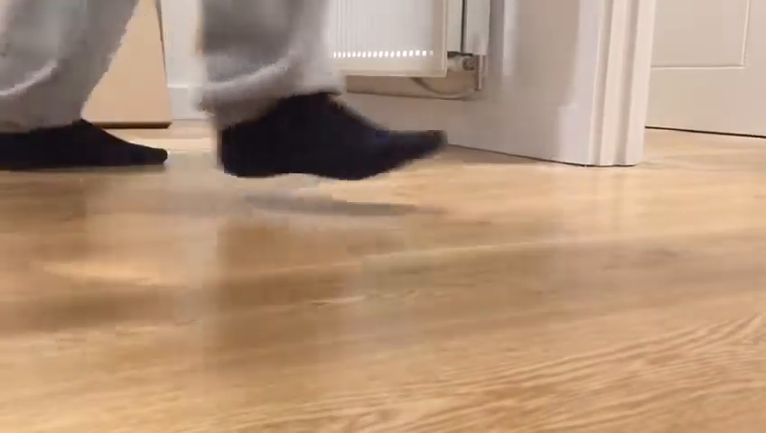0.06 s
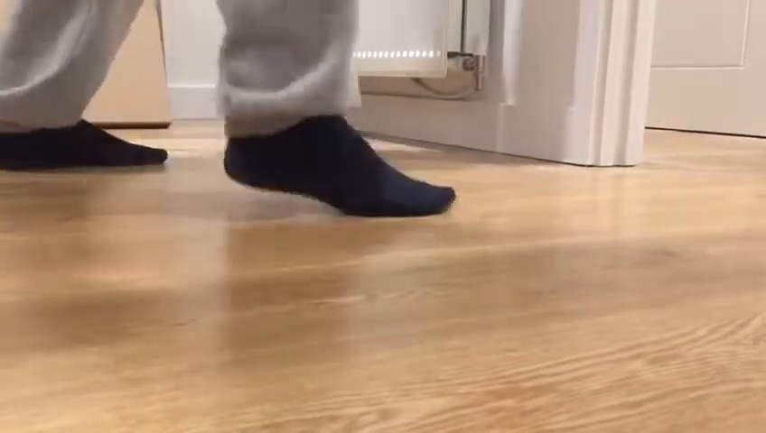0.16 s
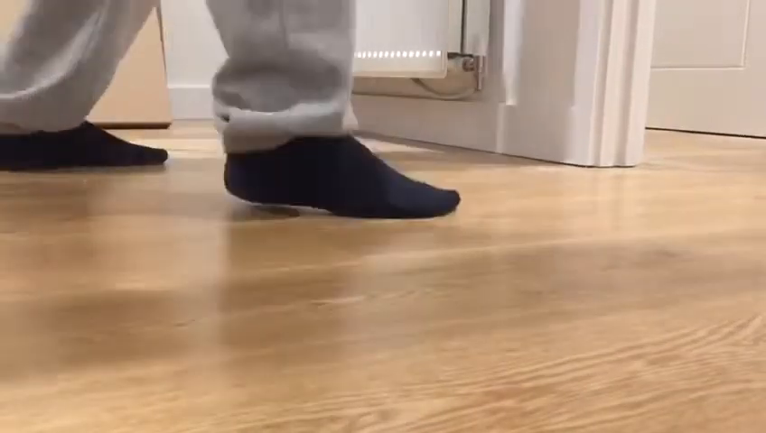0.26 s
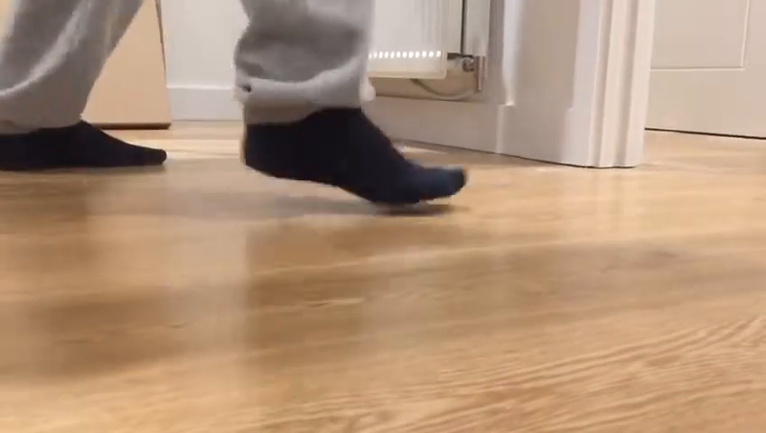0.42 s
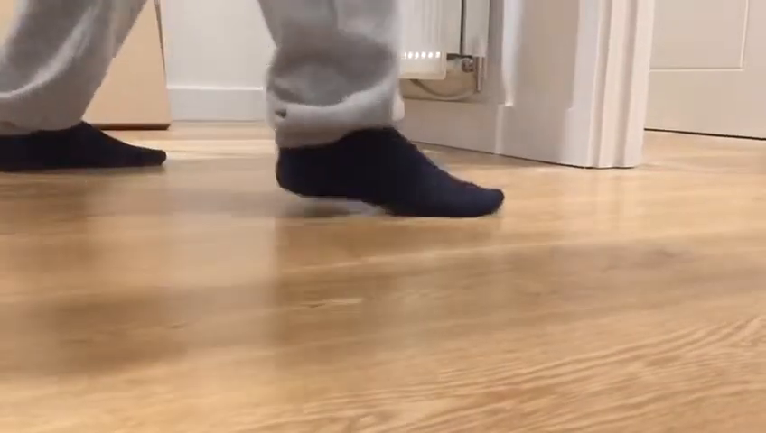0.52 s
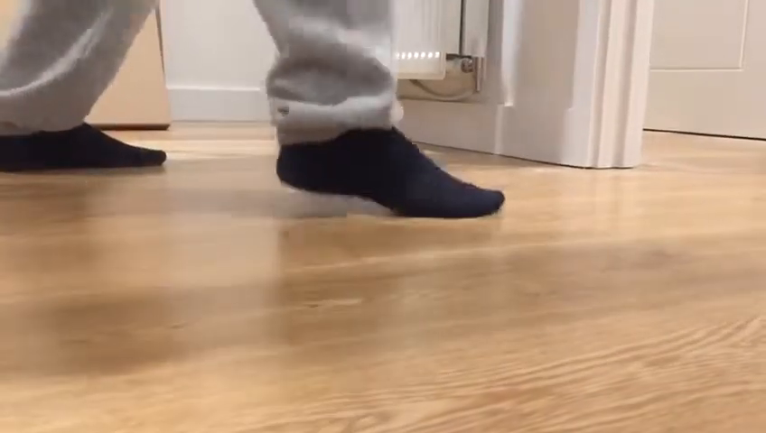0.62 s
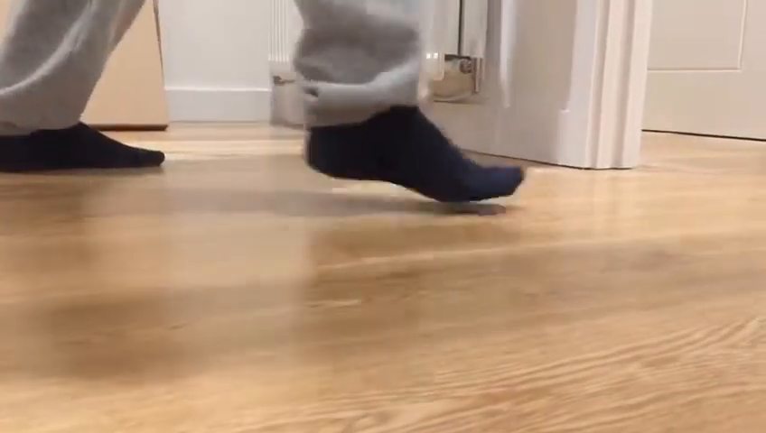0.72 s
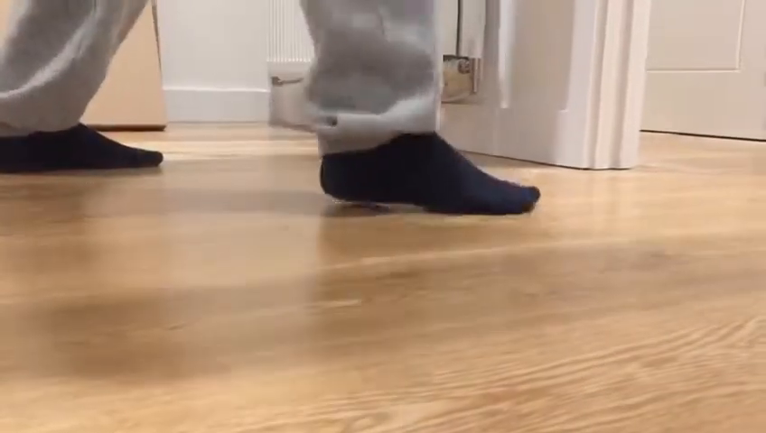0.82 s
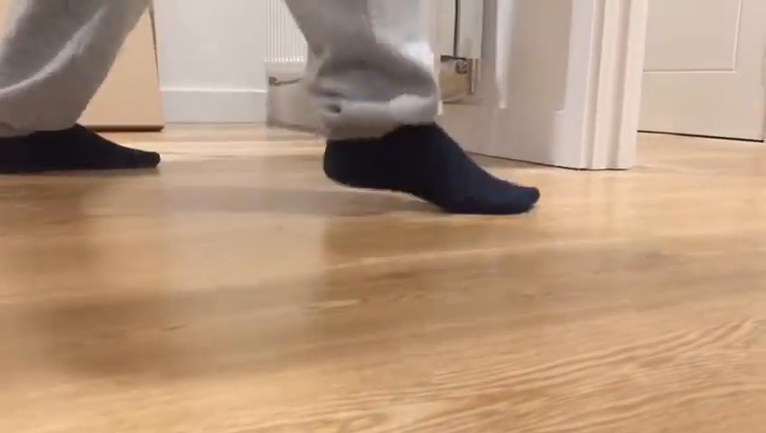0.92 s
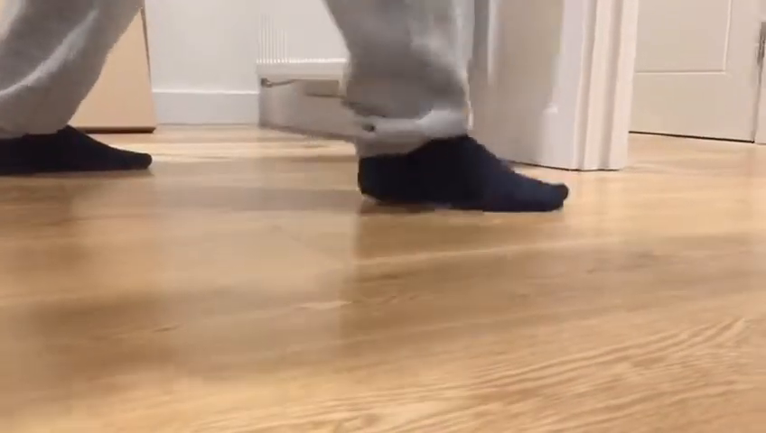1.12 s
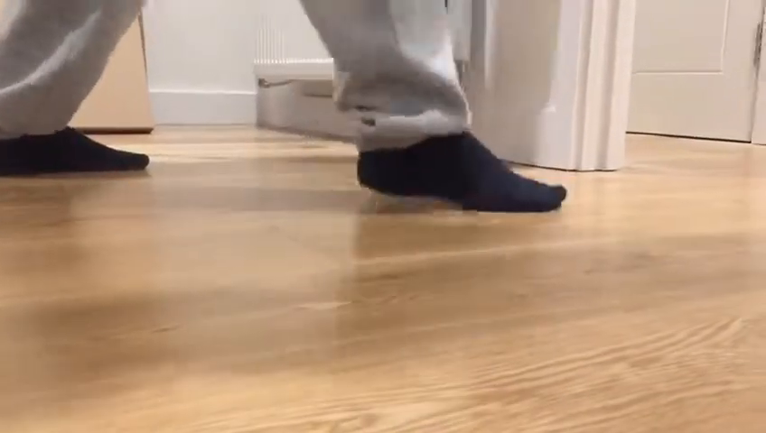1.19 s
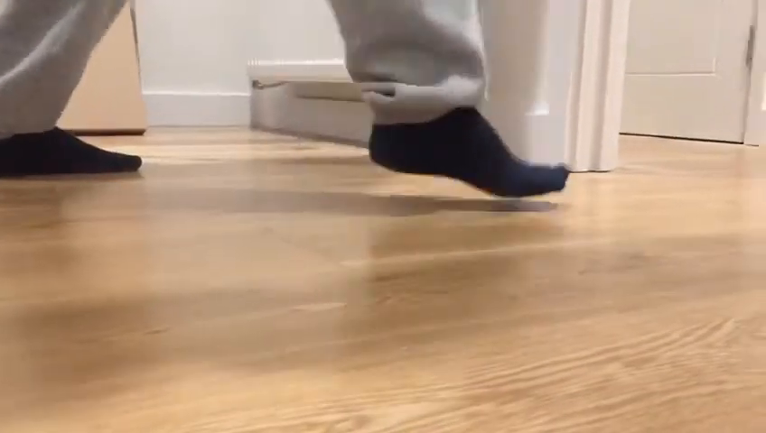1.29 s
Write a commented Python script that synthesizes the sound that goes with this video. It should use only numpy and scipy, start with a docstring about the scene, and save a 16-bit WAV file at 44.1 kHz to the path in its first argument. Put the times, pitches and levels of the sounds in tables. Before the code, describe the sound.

A wooden floor snaps under a socked foot at about 0.2 seconds, one sharp click over a low thud, ringing briefly in a small, bare room. Three much fainter knocks follow at roughly 0.6, 0.85 and 1.15 seconds as the foot shifts. Very soft brushes of sock on wood come and go from 0.5 to 1.3 seconds. A low room drone and faint hiss continue throughout.

```python
"""A joint in a wooden floor snaps under a foot in a sock, in a small, bare room.
The joint gives way in a few quick slips, each exciting the damped modes of the board and of the floor
beneath: a sharp click over a boom. Three faint knocks follow as the foot shifts. Between them the sock
brushes the wood with friction noise. Diffuse reflections and standing waves prolong the sounds of
the wood, over a low room drone and a faint hiss."""
import sys
import numpy as np
from scipy import signal
from scipy.fft import rfft, irfft, next_fast_len
from scipy.io import wavfile
from scipy.ndimage import uniform_filter1d

SR = 44100
rng = np.random.default_rng(int(sys.argv[2]) if len(sys.argv) > 2 else 0)


def transcribe(u):
    """Save the signal u as a 16-bit wav file named by the first command-line argument.

    u: samples, shape (n,) or (channels, n), limited to [-1, 1]; the rate is SR.
    q: integer samples, one column per channel.
    """
    v = np.clip(np.atleast_2d(u).T, -1, 1)
    q = np.round(v * 32767).astype(np.int16)
    wavfile.write(sys.argv[1], SR, q)


N = 59535
T = np.arange(N) / SR

# slips of the snapping joint: start_s, level_db, tilt_db_per_octave, crack_db, favoured_hz
SNAP_SLIPS = [(0.2162, -32.5, 6.5, -38, 2800), (0.2197, -23.5, -0.5, -51, 624),
              (0.2225, -28, 7.5, -59, 2750), (0.2335, -34, 4, -56, 2870)]
# modes of the snapping board: pitch_hz, level_db, t60_s
SNAP_MODES = [(600.4, -8, 0.048), (657.4, -2.5, 0.03), (914, -7.5, 0.057), (990, -5, 0.017),
              (1218, -2.5, 0.013), (1642, -1, 0.016), (2070, -8.5, 0.013), (2390, -7.5, 0.015),
              (2647, -8, 0.028), (2767, -16.5, 0.028), (2950, -8.5, 0.012), (3000, -38, 0.0081),
              (3600, -12, 0.0044), (4070, -19, .006)]
# contacts as the foot shifts: start_s, level_db, tilt_db_per_octave, crack_db, favoured_hz
KNOCK_CONTACTS = [(0.5760, -52.5, 0.0, -68, 840), (0.5810, -43.5, -2.5, -66, 2170),
                  (0.6000, -50, 2, -64, 1980), (0.6170, -71.5, -7, -78, 3000),
                  (0.8450, -50.5, -1.5, -60, 3060), (0.8502, -46.5, -1.0, -68, 3170),
                  (0.8700, -53, 6, -56, 2250), (0.8770, -56.5, 4, -71, 2440),
                  (1.0020, -59.5, 4.5, -55, 3200), (1.1405, -55, 0.5, -65, 2000),
                  (1.1475, -52, -2.0, -67, 930), (1.1675, -52, 1, -68, 3460)]
# modes of the knocking board: pitch_hz, level_db, t60_s
KNOCK_MODES = [(556, -3.5, 0.025), (704, 1.5, 0.013), (897, -9, 0.035), (1500, -14.5, 0.069),
               (2070, -10, 0.02), (2276, -10, 0.025), (2670, -13.5, 0.037), (3080, -19, 0.027),
               (3192, -11.5, 0.037), (3930, -5, 0.01)]
# low modes of the floor, excited by every click: pitch_hz, level_db, t60_s
FLOOR_MODES = [(79, -24, 0.12), (140, -26, .13), (228, -24, 0.12), (267, -16, .09), (298.8, -12, 0.25),
               (308, -24, 0.045), (391.7, -23.5, 0.34)]
# flexing of the floor under the weight: start_s, level_db, pitch_hz, rise_s
FLOOR_FLEXES = [(0.2267, -23, 105, 0.00434), (0.2330, -31.5, 289, 0.0047), (0.255, -42, 80.6, 0.014),
                (0.583, -36.5, 131.6, 0.0031), (0.5933, -33, 143.5, 0.013), (0.604, -38.5, 94, 0.0056),
                (0.852, -38, 125, 0.0044), (0.873, -41, 97, 0.0058), (1.1630, -43.5, 157, 0.0072)]
# ticks of the floor finish: start_s, level_db, low_edge_hz
FINISH_TICKS = [(0.236, -51, 5000), (0.2372, -60, 8000), (0.6163, -46, 7200), (1.0038, -60, 1790)]
# strokes of the sock on the wood: peak_s, level_db, half_length_s
SOCK_STROKES = [(.465, -67.5, 0.017), (0.609, -60.5, 0.011), (0.763, -63.5, 0.018), (0.874, -61.5, 0.015),
                (0.946, -77, 0.012), (1.041, -68, 0.022), (1.172, -60, 0.0079), (1.34, -64.5, 0.022)]
# spectrum of the sock's friction: frequency_hz, density_db
SOCK_SPECTRUM = [(300, -8), (700, -2.5), (1500, -3.5), (2800, 0.5), (4500, -10.5), (7000, -14),
                 (12000, -21.5)]
# strength of the reverberation: frequency_hz, gain_db
REVERB_GAIN = [(70, -8.5), (150, -13), (300, 1), (470, -10.5), (650, -7), (1000, -8), (1700, 3),
               (2800, -12), (4500, -1.5), (10000, -0.5)]
# reverberation time: frequency_hz, t60_s
REVERB_T60 = [(100, 0.44), (530, 0.34), (1400, 0.46), (3700, 0.42), (10000, 0.21)]
# standing waves of the room: pitch_hz, gain_db
STANDING_WAVES = [(76, -2), (140, -5), (379, -0.5), (411, 14.5), (629, -1.5), (891, 0.5), (949, -19),
                  (1196, 3.5), (1394, 5), (1595, 2), (1690, -23), (2457, 4), (2626, -7), (2967, -12)]
# resonances of the room drone: centre_hz, width_hz, level_db
DRONE_BANDS = [(75.7, 40, -63), (102.7, 64, -64), (151, 29, -66), (221.4, 16.3, -66), (253, 15.5, -60),
               (286, 16.7, -62.5), (331, 49, -72.5)]
# spectrum of the room hiss: frequency_hz, density_db
HISS_SPECTRUM = [(240, -6.5), (400, -5.5), (596, -3.5), (827, -12), (1760, -6.5), (1940, -11.5), (2470, -9),
                 (2730, -12), (12000, -25), (15600, -70), (22000, -120)]

CUTOFF_HZ = 12100   # upper limit of the ticks and of the whole sound


def board_clicks(contacts, modes, favour_db):
    """Modal response: each impulse gives a brief crack and rings the board, then the floor beneath."""
    pivot_hz, favour_octaves = 1680, 0.12
    crack_lag_s, crack_decay_s, floor_lag_s = 0.0005, 0.0019, 0.00099
    board, floor, crack_envelope = np.zeros((3, N))
    for start_s, level_db, tilt, crack_db, favoured_hz in contacts:
        for hz, mode_db, t60_s in modes:
            # the point of contact favours the modes near one pitch
            nearness = np.exp(-0.5 * (np.log2(hz / favoured_hz) / favour_octaves) ** 2)
            colour_db = tilt * np.log2(hz / pivot_hz) + favour_db * nearness
            board += from_db(level_db + mode_db + colour_db) * damped_mode(start_s, hz, t60_s)
        for hz, mode_db, t60_s in FLOOR_MODES:   # a brighter contact moves the floor less
            floor += from_db(level_db + mode_db - tilt) * damped_mode(start_s + floor_lag_s, hz, t60_s)
        age = T - start_s - crack_lag_s
        crack_envelope += from_db(crack_db) * (age >= 0) * np.exp(-np.abs(age) / crack_decay_s)
    crack = band_pass(crack_envelope * rng.standard_normal(N), low_hz=3760, high_hz=8600)
    # a narrow board radiates little bass, and wood on wood excites little treble
    radiation_hz, contact_hz = 514, 3610
    board_filter = signal.butter(4, [radiation_hz, contact_hz], "band", fs=SR, output="sos")
    return bending_dispersion(signal.sosfilt(board_filter, board) + crack + floor)


def damped_mode(start_s, hz, t60_s):
    """Free vibration: a struck mode is a sine that decays by 60 dB in t60_s."""
    age = np.maximum(T - start_s, 0)
    return np.sin(2 * np.pi * hz * age) * from_db(-60 * np.minimum(age / t60_s, 4))


def bending_dispersion(x, travel_at_1khz_s=0.001921):
    """Dispersion: bending wave speed grows as the root of frequency, so a click becomes a falling chirp."""
    size = next_fast_len(2 * N)
    khz = np.arange(size // 2 + 1) * SR / size / 1000
    lag_cycles = 2000 * travel_at_1khz_s * np.sqrt(khz)
    return irfft(rfft(x, size) * np.exp(-2j * np.pi * lag_cycles), size)[:N]


def floor_thuds(sag_octaves_per_s=10.7):
    """Flexure under load: the floor swings for a few cycles, its pitch sinking as the weight settles."""
    thuds = np.zeros(N)
    for start_s, level_db, hz, rise_s in FLOOR_FLEXES:
        age = np.maximum(T - start_s, 0)
        cycles = np.cumsum((age > 0) * hz * 2 ** (-sag_octaves_per_s * age)) / SR
        envelope = (age / rise_s * np.exp(1 - age / rise_s)) ** 2
        thuds += from_db(level_db) * envelope * np.sin(2 * np.pi * cycles)
    return thuds


def finish_ticks(decay_s=0.0004):
    """Short transients are broadband: the finish ticks in treble bursts of a millisecond or two."""
    ticks = np.zeros(N)
    for start_s, level_db, low_hz in FINISH_TICKS:
        envelope = (T >= start_s) * np.exp(-np.abs(T - start_s) / decay_s)
        ticks += from_db(level_db) * band_pass(rng.standard_normal(N) * envelope, low_hz, CUTOFF_HZ)
    return ticks


def sock_friction(grain_db=1.5, grains_per_s=510):
    """Sliding friction: cloth on wood gives short swells of noise with a grainy, flickering level."""
    swells = sum(from_db(level_db) * np.exp(-0.5 * ((T - peak_s) / half_length_s) ** 2)
                 for peak_s, level_db, half_length_s in SOCK_STROKES)
    grain = unit_rms(uniform_filter1d(rng.standard_normal(N), int(SR / grains_per_s)))
    return swells * unit_rms(coloured_noise(SOCK_SPECTRUM) * from_db(grain_db * grain))


def reverberation(x, delay_s=0.0027, build_s=0.0059):
    """Diffuse field: reflections build up quickly, then decay exponentially in each half-octave band."""
    edges_hz = 50 * 2 ** np.arange(0, 8.5, 0.5)
    white = rng.standard_normal((2, N))   # neighbouring bands take independent noise
    age = np.maximum(T - delay_s, 0)
    build_up = 1 - np.exp(-age / build_s)
    response = np.zeros(N)
    for k, (low_hz, high_hz) in enumerate(zip(edges_hz, edges_hz[1:])):
        centre_hz = np.sqrt(low_hz * high_hz)
        decay = from_db(-60 * age / at_hz(REVERB_T60, centre_hz))
        tail = unit_rms(band_pass(white[k % 2], low_hz, high_hz) * build_up * decay)
        unity_gain = np.sqrt(2 * (high_hz - low_hz) / SR / N)
        response += from_db(at_hz(REVERB_GAIN, centre_hz)) * tail * unity_gain
    return signal.fftconvolve(x, response)[:N]


def standing_waves(x, width_hz=4.8):
    """Resonance: narrow modes of the room ring on after the sound that drives them."""
    return sum(from_db(gain_db) * signal.lfilter(*signal.iirpeak(hz, hz / width_hz, fs=SR), x)
               for hz, gain_db in STANDING_WAVES)


def drone_and_hiss(hiss_db=-68):
    """Stationary noise: a few low resonances drone under an even broadband hiss."""
    drone = np.zeros(N)
    for centre_hz, width_hz, level_db in DRONE_BANDS:
        white = rng.standard_normal(2 * N)
        resonance = band_pass(white, centre_hz - width_hz / 2, centre_hz + width_hz / 2)
        drone += from_db(level_db) * unit_rms(resonance[N:])   # steady state only
    return drone + from_db(hiss_db) * coloured_noise(HISS_SPECTRUM)


def coloured_noise(spectrum):
    """Spectral shaping: white noise weighted by a spectrum, at an rms of 1."""
    hz = np.linspace(0, SR / 2, N // 2 + 1)
    white_spectrum = rfft(rng.standard_normal(N))
    return unit_rms(irfft(white_spectrum * from_db(at_hz(spectrum, hz)), N))


def band_pass(x, low_hz, high_hz):
    """Butterworth filtering between two edge frequencies."""
    return signal.sosfilt(signal.butter(2, [low_hz, high_hz], "band", fs=SR, output="sos"), x)


def at_hz(points, hz):
    """Interpolation of a table on a logarithmic frequency axis."""
    frequencies, values = np.transpose(points)
    return np.interp(np.log(np.maximum(hz, 1)), np.log(frequencies), values)


def from_db(db):
    """Amplitude ratio of a level in decibels."""
    return 10 ** (np.asarray(db) / 20)


def unit_rms(x):
    """Normalisation to an rms of 1."""
    return x / np.sqrt(np.mean(x ** 2) + 1e-20)


def scene():
    """Superposition: the direct sound of the floor, the room's response, the sock and the background."""
    snap = board_clicks(SNAP_SLIPS, SNAP_MODES, favour_db=2.5)
    knocks = board_clicks(KNOCK_CONTACTS, KNOCK_MODES, favour_db=6)
    wood = snap + knocks + floor_thuds()
    ticks = finish_ticks()
    # directivity: the ticks point at the listener and excite the room less
    reflections = reverberation(wood + from_db(-10) * ticks) + standing_waves(wood)
    return (wood + ticks + reflections + sock_friction() + drone_and_hiss())[None]


def record(dry):
    """Band limiting: the microphone loses the deepest bass, and a steep low-pass cuts the top."""
    low_cut = signal.butter(3, 54, "high", fs=SR, output="sos")
    top_cut = signal.ellip(10, 0.1, 70, CUTOFF_HZ, fs=SR, output="sos")
    return signal.sosfilt(top_cut, signal.sosfilt(low_cut, dry))


dry = scene()
out = record(dry)
transcribe(out)
```